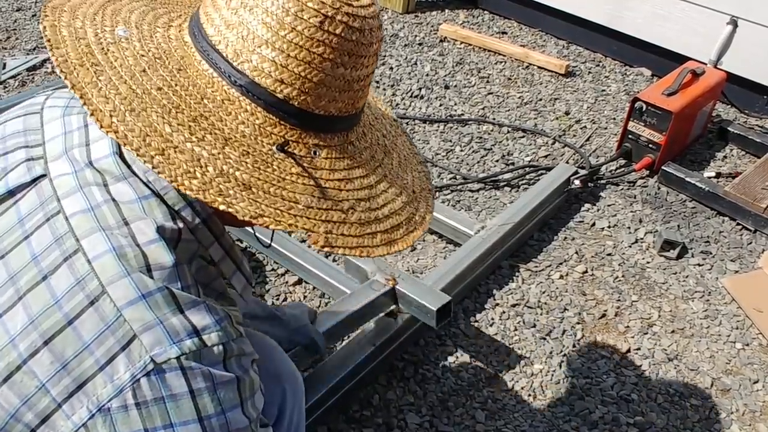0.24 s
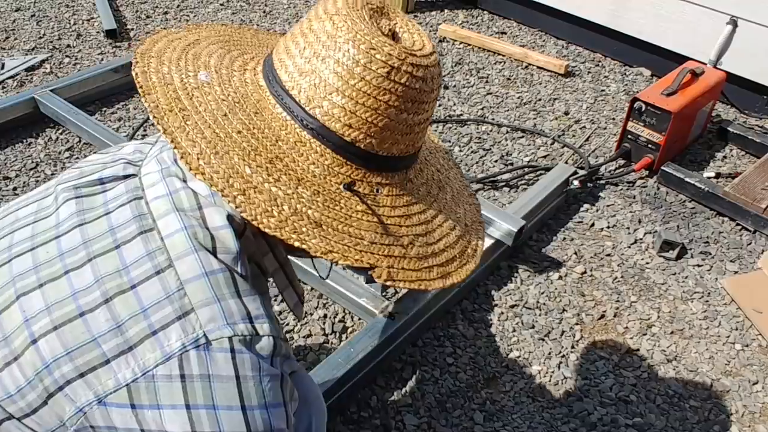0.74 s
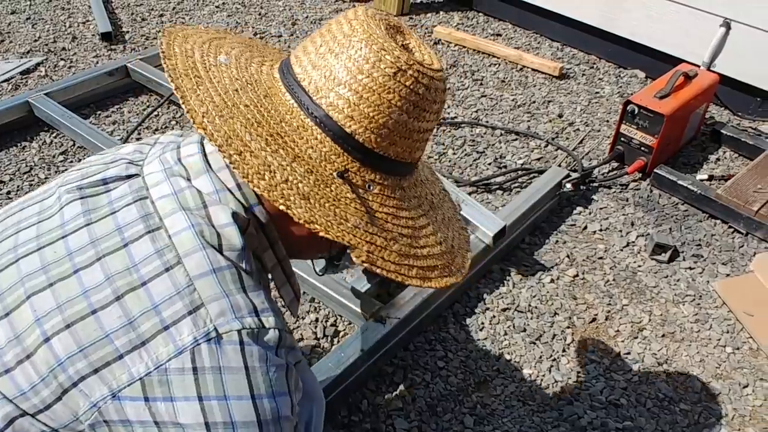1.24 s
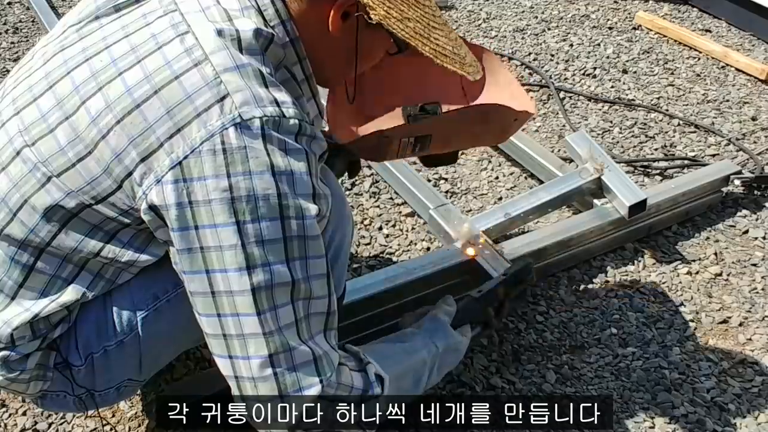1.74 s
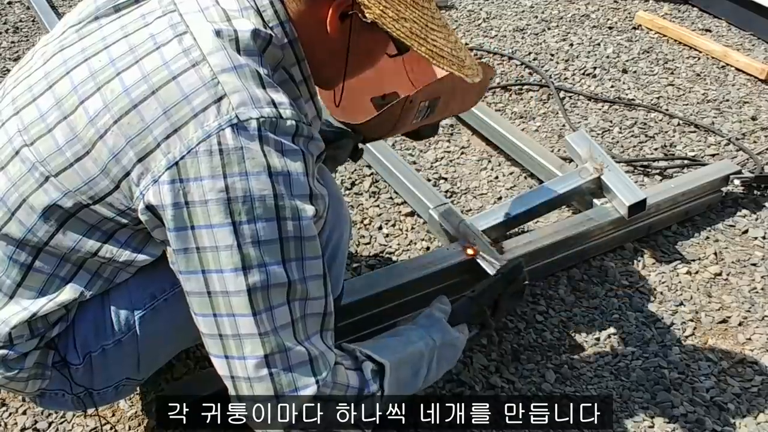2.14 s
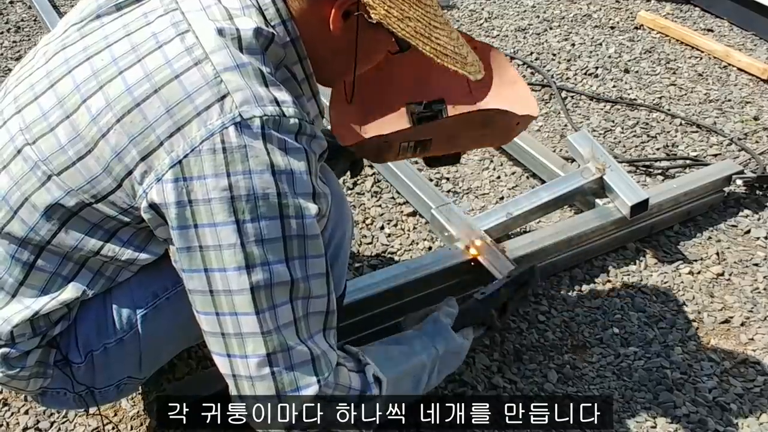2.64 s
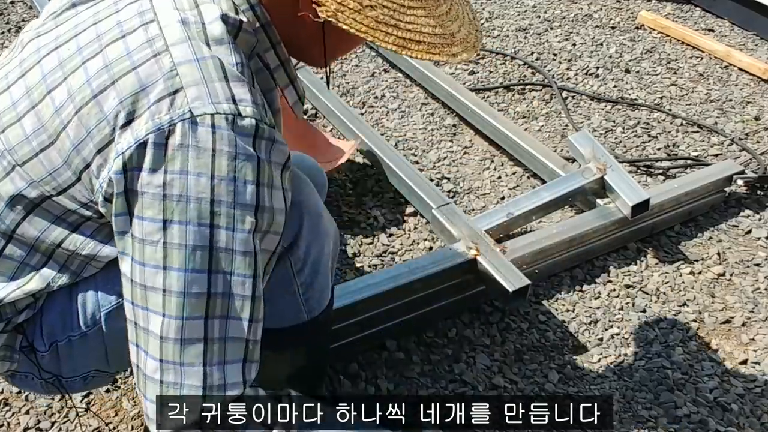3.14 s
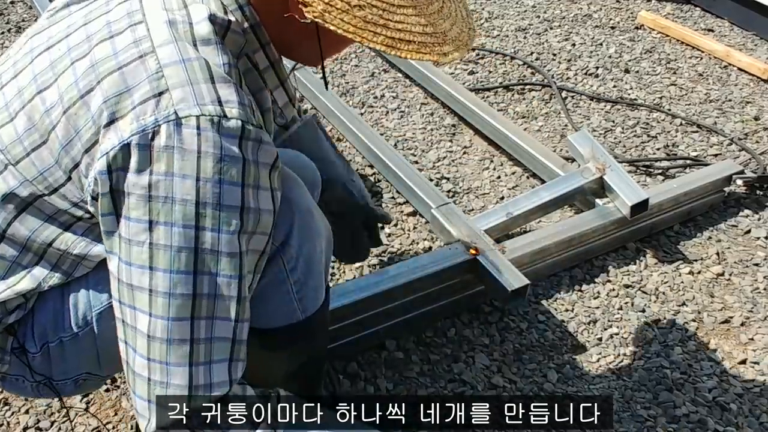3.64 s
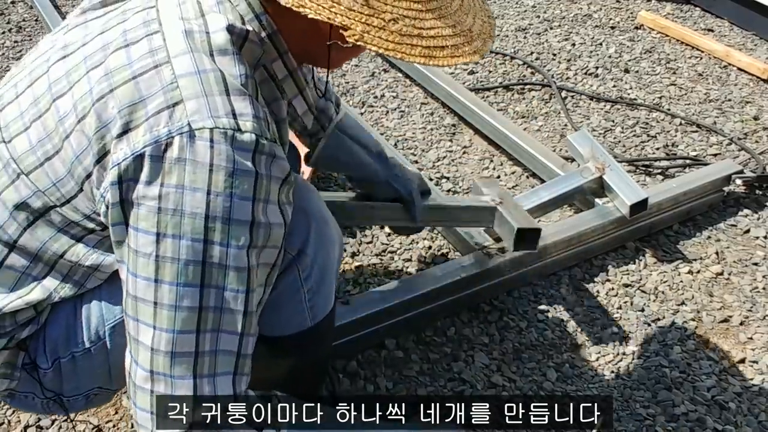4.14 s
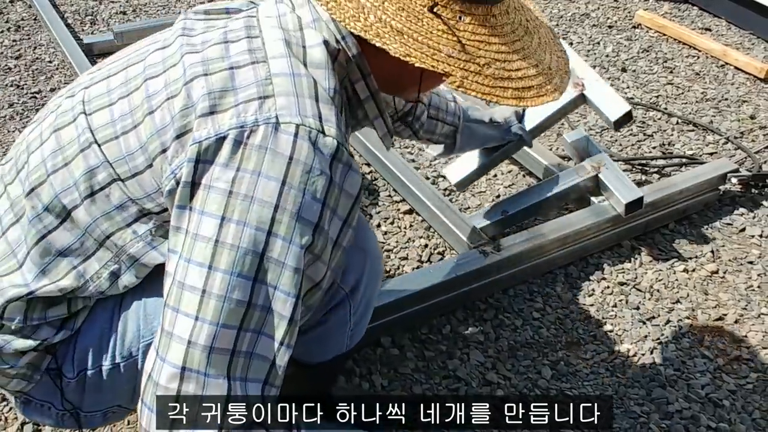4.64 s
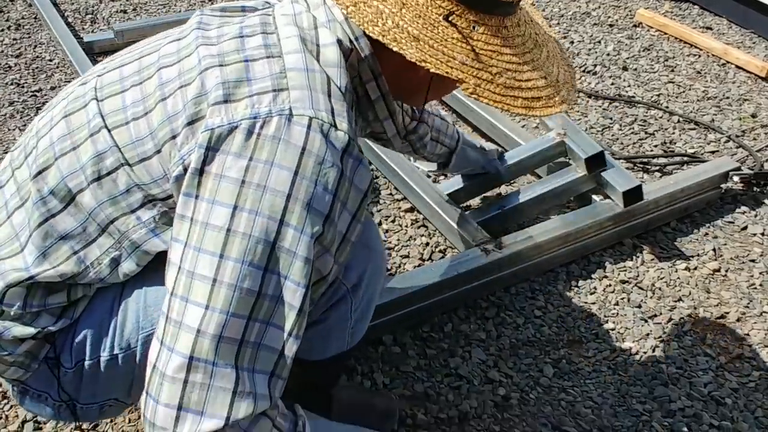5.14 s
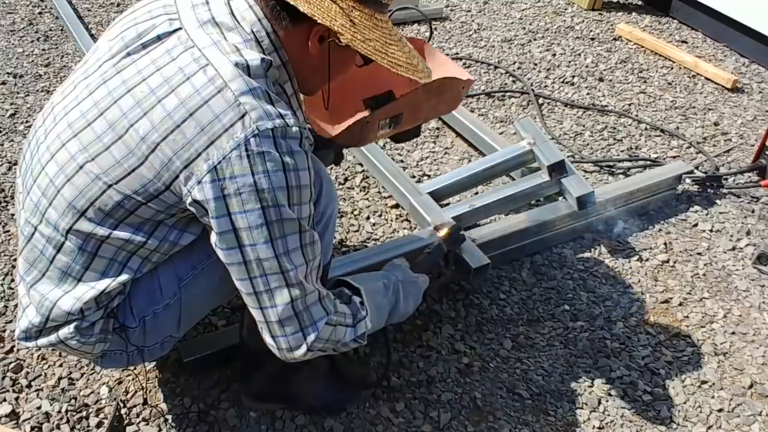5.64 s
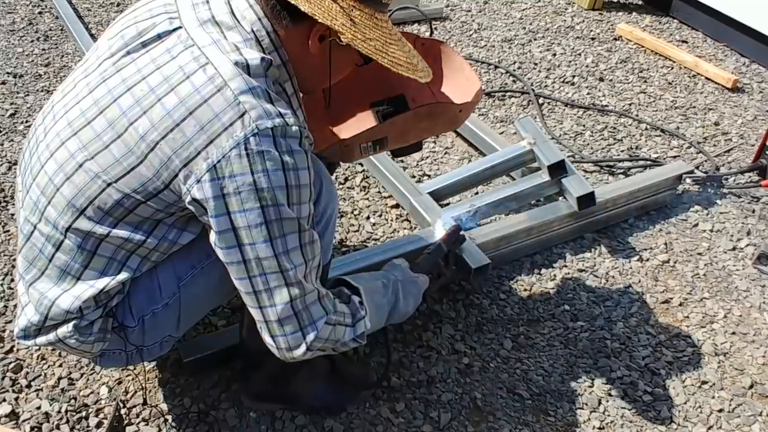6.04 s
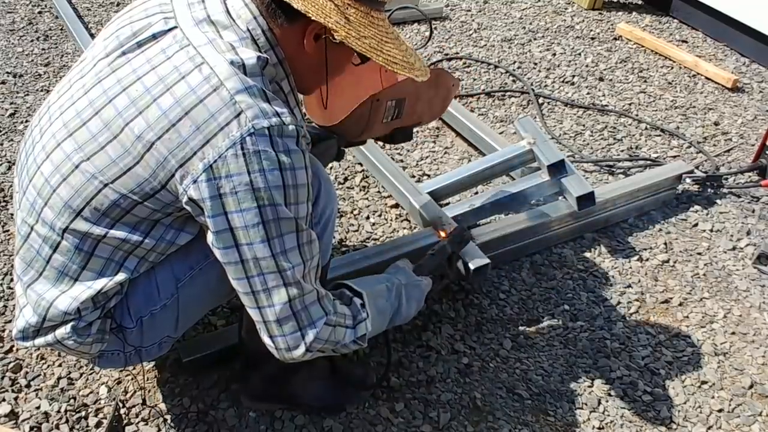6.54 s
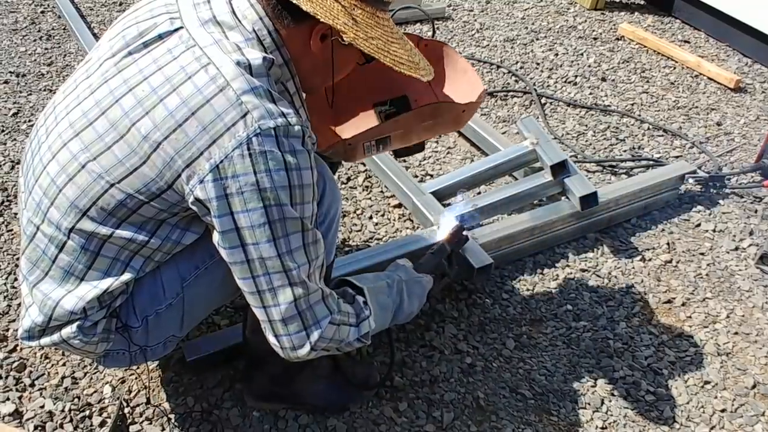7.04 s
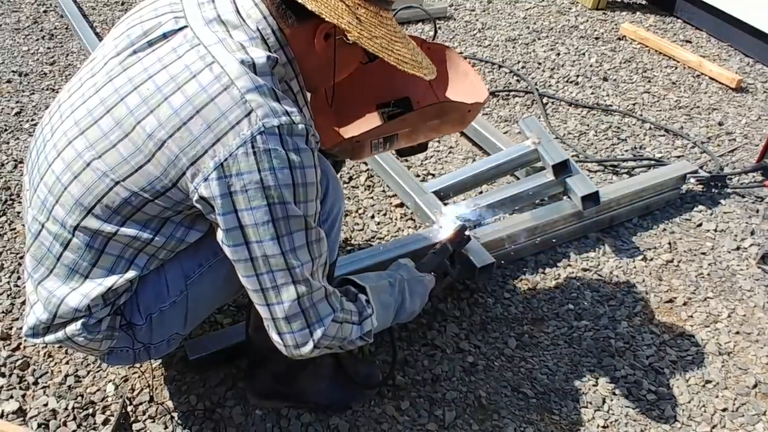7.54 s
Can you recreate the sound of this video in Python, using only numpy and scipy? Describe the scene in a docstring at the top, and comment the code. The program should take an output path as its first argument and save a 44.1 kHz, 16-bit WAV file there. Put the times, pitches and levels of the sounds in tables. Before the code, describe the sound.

Close outdoor stereo sound in a gravel yard. Loose steel tubes clank hard in the first half second, then small knocks and scrapes follow. A short weld crackles near two seconds, then metal and slag bits tick and knock. Tubes clunk lightly, then a loud ringing clank comes past four seconds. After a pause, longer sizzling burns spit until just after seven, ending in a small knock.

```python
"""Steel tubes and a stick welder

Square steel tubes are laid down, knocked and lifted on a gravel yard; between, a stick welder sizzles and spits.
Blows ring banks of decaying modes; shaped noise makes the loose steel and gravel, the arc, breeze and far traffic.
A hollow tube hoots as a wavering sine with breath. A two-port pocket microphone hears it all."""
import sys
import numpy as np
from scipy import signal
from scipy.fft import rfft, irfft, next_fast_len
from scipy.io import wavfile
from scipy.ndimage import uniform_filter1d

SR = 44100
rng = np.random.default_rng(int(sys.argv[2]) if len(sys.argv) > 2 else 0)


def file_out(sig):
    """Save sig as 16-bit WAV at sys.argv[1]."""
    # one column per channel
    cols = np.atleast_2d(sig).T
    # limit, then scale
    lim = np.clip(cols, -1, 1)
    pcm = np.round(lim * 32767).astype(np.int16)
    wavfile.write(sys.argv[1], SR, pcm)


N = 344421
# shares of a left-minus-right figure given to the left and right port
LEFT_RIGHT = np.array([[.5], [-.5]])

# Far traffic and rustle, spectral shape: f/Hz, relative level/dB per Hz
YARD_COLOUR = [(60, -28.5), (100, 3.5), (160, 1.5), (250, 0.5), (380, 4), (500, -8.5), (650, -6.5),
               (1000, -12.5), (1600, -18.5), (2400, -21.5), (4300, -21), (5200, -32), (8300, -30.5),
               (13000, -38.5)]
YARD_DB = -58  # rustle level before its swells
# Breeze on the ports: t/s, level/dB
BREEZE = [(0.0, -68.5), (0.48, -52.5), (0.96, -58.5), (1.15, -43), (1.2, -57), (1.28, -32.5), (1.46, -58),
          (1.569, -42.5), (1.65, -71), (2.04, -60.5), (2.089, -51.5), (2.65, -65), (2.67, -56),
          (4.39, -61.5), (4.44, -74), (4.96, -60), (6.79, -68.5), (7.81, -58)]
BREEZE_PAN_DB = -11  # left minus right
CALM_DB, GUST_SHARE = -67.5, .4  # above calm, the rustle swells by this share of the gust's dB

# Bending and wall modes of the tube: f/Hz
TUBE_HZ = [425, 549, 683, 782, 1245, 1260.4, 1271, 1345, 1727, 1825, 1856, 2049, 2060, 2081, 2089, 2096,
           2127, 2157, 2200, 2272, 2281, 2452, 2470, 2520, 2563, 2608, 2670, 2680, 2800, 3004, 3122, 3207,
           3246, 3300, 3515, 3650, 3684, 4194, 4288, 4523, 4615, 5010, 6890, 7120, 8955, 1150, 1480, 2864,
           3075, 4360, 4740, 5243, 5658, 5975, 7203]
# The same modes: own t60/s, then level/dB when laid down, tapped, lifted, dropped on the frame
TUBE_MODES = [(0.34, -31, -56.5, -38, -37), (0.16, -19, -37, -29.5, -30.5), (.15, -24, -44.5, -47, -41.5),
              (0.09, -14.5, -51, -37, -23), (0.052, -38, -47, -42.5, -27.5), (1.6, -62, -61, -59, -37),
              (5.0, -58.5, -61.5, -72, -46.5), (0.34, -38.5, -51, -38, -27.5), (0.5, -39, -64, -61, -29.5),
              (0.18, -33, -38, -46, -26.5), (0.16, -11, -22, -26.5, -20.5), (0.82, -48, -46, -44, -26.5),
              (.12, -33, -19, -46, -36), (0.8, -30.5, -46, -38.5, -32.5), (3, -57, -39, -57.5, -71.5),
              (0.9, -30, -49.5, -57, -27), (0.66, -44, -38.5, -33.5, -27), (0.88, -45.5, -52, -32, -35.5),
              (0.49, -47, -60, -46, -32), (0.12, -32, -19, -22, -31), (.7, -50, -55, -31.5, -35.5),
              (0.73, -45.5, -48.5, -48, -33.5), (.15, -40.5, -39, -44, -19), (.14, -23, -23.5, -42, -36),
              (0.44, -33, -44.5, -28, -22), (0.29, -16.5, -28.5, -33, -27),
              (0.75, -48.5, -55.5, -28.5, -50), (1.3, -32.5, -44, -46, -56), (0.44, -50, -50, -47, -33.5),
              (0.25, -30.5, -22.5, -30, -21), (0.37, -47, -48, -46, -25.5), (0.17, -41.5, -35, -32, -29),
              (0.074, -30.5, -11.5, -43.5, -25), (0.3, -52, -50.5, -55, -33.5), (.1, -38, -25, -51, -39.5),
              (0.39, -41.5, -36.5, -44.5, -22), (0.35, -36.5, -19, -33, -30),
              (0.43, -39.5, -41.5, -29.5, -28), (0.2, -29.5, -21, -38, -36.5),
              (0.072, -30.5, -16.5, -30, -40.5), (0.068, -26, -18.5, -52, -31.5),
              (0.2, -43, -50, -39, -31.5), (0.13, -43, -25.5, -38, -33.5), (0.12, -35, -47, -29, -26.5),
              (0.08, -37, -21, -42, -41.5), (0.17, -36, -50, -34, -35), (.25, -38.5, -50, -40, -38),
              (0.14, -31.5, -32.5, -36, -23), (0.13, -32, -30.5, -22.5, -23.5), (.28, -37.5, -32, -40, -31),
              (.3, -39.5, -36, -35, -37.5), (0.21, -40.5, -33.5, -40, -38), (0.092, -40, -34, -45.5, -37.5),
              (.09, -40.5, -31.5, -46, -30.5), (0.16, -38, -32.5, -41, -30)]
# Blows, one list per way of striking: t/s, strength/dB, time in the air before settling/s
BLOWS = [
    [(.072, -48.5, 0.046), (.280, 2, 0.054), (.347, -6, 0.012), (.364, -6, 0.029)],
    [(.487, 3.5, 0.04)],
    [(3.426, -3, 0.0073), (3.49, -9.5, 0.023), (3.514, -2.5, 0.025)],
    [(4.283, 3.5, 0.03), (4.32, 6, 0.027), (4.35, 2.5, 0.035)],
]
# When the last ring of each way of striking is stopped: t/s
LAST_RING_END_S = [.486, 1.632, 4.28, 5.355]
# Peak drive of the modes by loose rattle, per way of striking: level/dB
CHATTER_DB = [-21.5, -61.5, -13, -31.5]
# Tube balance per way of striking: left minus right/dB
TUBE_PAN_DB = [-2.5, -5.5, -1.4, -1.3]
AIR_SHARE = 0.54  # share of the damping spared in the air
SETTLE_S, SETTLE_LOSS = 0.04, 0.8  # while settling, extra loss as a multiple of the usual
OLD_RING_AGE_S, OLD_RING_DB, OLD_RING_END_S = 0.5, 3, 0.19  # an earlier lift still rings at the start

# Loose steel, gravel and cloth: t/s, level/dB, hold/s, t60/s, thud re clatter/dB, grit re clatter/dB
RATTLE = [(0.211, -47.5, 0.048, 0.034, -3.5, 7), (0.259, -45, 0.022, 0.034, 7, 6),
          (0.2793, -15, 0.0034, 0.19, -14, -61), (0.331, -40.5, 0.033, .1, 6.5, -43),
          (0.344, -19, 0.028, 0.44, -8.5, -62), (0.484, -14.5, 0.0025, 0.2, -43, -3.5),
          (0.502, -37, 0.091, 0.11, -0.5, -16), (0.596, -52, 0.94, .04, 0, -2.5),
          (0.616, -44.5, 0.036, 0.91, -6.5, -1), (0.734, -53.5, 0.075, 0.071, -2, 8),
          (0.979, -37, 0.0059, 0.098, -14, -0.5), (1.205, -45.5, 0.016, 0.72, 7, 7),
          (1.47, -48, 0.13, .04, -0.5, -7), (2.156, -65, 0.33, 0.043, 11.5, -3),
          (2.6762, -26, 0.0034, 0.19, -3.5, -24.5), (2.841, -55, 0.051, 0.13, 0, -30),
          (2.9, -45, 0.0044, 0.29, -6, -23), (3.065, -55.5, .01, 0.2, 4.5, -27),
          (3.139, -67, 0.17, .1, 7, -25), (3.308, -56, 0.08, .05, -1.5, -9),
          (3.397, -48, 0.022, .05, 9, -22), (3.418, -28, 0.0093, 0.3, 0.5, -38),
          (3.483, -40.5, 0.075, 0.24, -3.5, -9), (4.2807, -16.5, 0.081, 0.23, -11.5, -10),
          (4.451, -44, 0.042, 0.52, -52, -31), (5.327, -61, 0.031, .03, -19, -1),
          (7.607, -58, 0.0037, 0.75, -22, -4.5), (7.654, -69, 0.063, 0.043, 13.5, -7),
          (7.7678, -31, 0.0031, 0.1, 4, -13.5)]
# Thud, knock, clatter and grit bands: f/Hz, width/Hz
RATTLE_BANDS = [(370, 465), (1000, 475), (2600, 2350), (7000, 4000)]
RATTLE_RISE_S = 0.0013
THUD_LINGER, GRIT_LINGER = 0.94, .9  # their decay times as multiples of the clatter's

# Small knocks: t/s, body peak level/dB, body f/Hz, body t60/s, snap re body/dB
KNOCKS = [(0.221, -25, 6670, 0.032, 1), (.364, -12.5, 825, .012, 2), (.505, -20.5, 547, 0.053, -20),
          (.548, -23, 580, 0.072, -19.5), (0.628, -23, 8700, 0.054, -2), (0.733, -27.5, 990, 0.14, -1),
          (.897, -26, 7250, 0.028, 2), (0.943, -24.5, 4730, 0.013, 0), (.982, -28, 4900, 0.039, -8),
          (1.009, -30.5, 4500, 0.064, 6), (0.779, -43, 1190, 0.043, -1), (.81, -28.5, 1120, 0.027, 3),
          (1.092, -24.5, 1590, 0.013, -27), (1.182, -31, 970, 0.013, 1), (1.215, -23, 1200, 0.15, -5),
          (1.234, -22.5, 835, 0.028, -13), (1.284, -28, 1150, 0.045, 0), (1.301, -29.5, 890, 0.23, 2.5),
          (1.378, -26, 6560, 0.0048, -15), (1.491, -31.5, 1340, 0.1, -2), (1.529, -33, 1020, 0.056, 0),
          (1.56, -31, 1190, 0.046, -16), (1.60, -30.5, 780, 0.074, -18), (1.615, -25, 1520, 0.017, -3.5),
          (1.644, -54, 7020, 0.011, 2.5), (2.235, -48, 5500, 0.05, 11), (2.329, -44.5, 4530, 0.071, -0.5),
          (2.6797, -13.5, 1130, 0.015, -5.5), (2.699, -22.5, 1020, 0.042, -10.5),
          (2.733, -16, 2700, 0.0062, -33), (2.755, -25.5, 1450, 0.0097, -31.5),
          (2.79, -40, 1240, 0.018, -30), (2.865, -31, 1810, 0.044, -28), (2.896, -20, 2820, 0.029, -27),
          (2.897, -28, 1300, 0.025, -26.5), (2.948, -23.5, 3470, 0.0085, -27),
          (3.055, -45.5, 2144, 0.091, -20), (3.153, -34, 2080, 0.033, -25), (3.27, -42.5, 2230, 0.043, -7),
          (3.635, -43, 1360, 0.018, -16), (3.811, -46, 787, 0.018, -30), (3.811, -47.5, 1815, 0.017, -20),
          (3.844, -54.5, 3500, 0.13, 4.5), (3.946, -56.5, 1590, .02, -2.5), (4.08, -62, 2960, 0.025, 1),
          (4.913, -49, 4220, 0.021, -9), (4.915, -49, 1615, .02, -19), (4.974, -54, 1707, 0.035, -20),
          (5.941, -44.5, 4900, 0.044, -9), (7.771, -29, 770, 0.014, 1.5)]
KNOCK_THUD_DB = -16  # relative to the body

# Burns of the arc: strike t/s, catch t/s, break t/s
BURNS_S = [(1.776, 1.778, 2.092), (5.36, 5.41, 5.822), (6.336, 6.34, 6.542), (6.553, 6.58, 7.352)]
# Each burn: base level/dB, swell/dB, catch flare/dB, break flare/dB, base treble lift/dB,
# growl lift (about 0.4 to 2.4 kHz)/dB, left minus right/dB
ARC = [(-49, 8, 10, 9, -8.5, 7.5, 0), (-49, 7.5, 9.5, 12, 0.5, 0.6, 0), (-45, 1.2, 7, 9.5, -3.5, 4, -1),
       (-41.5, 5.5, -3.5, -1.5, -0.5, 0.4, -0.7)]
# Sizzle, spectral shape: f/Hz, relative level/dB per Hz
ARC_COLOUR = [(290, -18.5), (600, -22.5), (1090, -6), (1320, -8), (2070, -1.5), (3320, -2), (4100, -9),
              (4470, -3), (5300, -4.5), (6500, -12.5), (7300, -2.5), (8800, -8.5), (10100, -7),
              (12600, -19), (15000, -22)]
# Boom of gas in each burn: level/dB at the catch, level/dB just before the break
BOOM_DB = [(-40, -30), (-66, -31.5), (-39, -63), (-51, -31)]
CATCH_S, BREAK_S = 0.036, 0.019  # time constants of the flares
DIE_T60_S, BREAK_TREBLE_DB = 0.019, 4  # sizzle's decay after the break; treble added at the break
# Loud spits of metal: t/s, body peak level/dB, thump re body before a common lift/dB
SPITS = [(1.7565, -49, -38), (1.78, -24.5, -5.5), (1.858, -41, -40), (1.8961, -32, -12), (1.955, -26, -38),
         (1.963, -19.5, -25), (1.9795, -23, -38), (1.9978, -29, -23), (2.017, -39, -40),
         (2.0917, -13, -26.5), (2.114, -26, -39), (5.4024, -27, -27), (5.414, -23, -40), (5.419, -26, -25),
         (5.489, -23, -27), (5.541, -23, -30), (5.548, -22, -25), (5.59, -33, -40), (5.645, -28.5, -40),
         (5.676, -33, -40), (5.684, -20, -30), (5.7066, -17.5, -14.5), (5.759, -28, -40),
         (5.7995, -14.5, -27), (5.8084, -15.5, -29), (5.825, -14, -20), (6.34, -24, -14),
         (6.43, -20.5, -17), (6.495, -33, -40), (6.5113, -23.5, -40), (6.5393, -21.5, -23),
         (6.64, -37, -15), (6.7036, -42, -28), (6.7601, -18, -28), (6.774, -24, -36), (6.81, -32, -42),
         (6.857, -18, -34), (6.9988, -20, -25), (7.006, -17.5, -38), (7.0914, -18.5, -40),
         (7.1398, -25.5, -7), (7.2256, -13.5, -27), (7.2907, -21, -19.5), (7.3258, -33, -19),
         (7.341, -14.5, -31), (7.351, -13, -18)]
SPIT_HISS_DB, THUMP_LIFT_DB = 3, 2.5  # hiss relative to the body; lift common to all thumps
SMALL_SPITS_PER_S, SMALL_SPIT_DB, SMALL_SPIT_SPREAD_DB = 6, -50, 5  # spread is plus or minus
SMALL_THUMP_DB = -20  # relative to the body, before the common lift

# Air in a hollow tube, puff by puff: t/s, nominal length/s, pitch f/Hz, level/dB before flutter
HOOT = [(2.736, 0.035, 602.5, -36), (2.784, 0.031, 605.5, -43), (2.865, 0.026, 606.4, -49.5),
        (2.9, 0.013, 602, -23.5), (2.92, 0.011, 619, -37), (2.955, 0.016, 602.6, -34.5),
        (2.982, 0.022, 606, -43), (3.005, 0.013, 600.7, -33.5), (3.025, 0.069, 618.4, -47),
        (3.163, 0.023, 627.5, -49.5), (5.642, 0.06, 649, -49.5), (5.718, 0.061, 643, -45),
        (5.768, 0.076, 666.5, -40.5), (5.821, 0.073, 647, -44), (5.927, 0.042, 652, -44.5),
        (7.378, 0.07, 650, -45), (7.469, 0.028, 782, -48.5), (7.5, 0.045, 632, -50.5)]
# Modes of the electrode rod: f/Hz, t60/s, level/dB
ROD_MODES = [(1082, 0.76, -9), (2480, 0.18, -10.5), (2820, 0.57, -17), (3904, 0.22, -2), (4200, 0.12, 1.5),
             (4230, 0.15, -6), (5470, 0.24, -8), (7800, .15, -14)]
# The rod touches the steel: t/s, strength/dB
TICKS = [(7.61, -45), (7.652, -51.5)]
TOP_HZ = 15900  # the microphone's steep cut-off


def undb(db):
    """Decibels to an amplitude factor."""
    return 10 ** (np.asarray(db) / 20)


def unit(x):
    """Scale to an RMS of 1."""
    return x / np.sqrt(np.mean(x ** 2))


def band(x, hz, width):
    """Two-pole-pair band-pass around hz."""
    low = np.sqrt(hz ** 2 + width ** 2 / 4) - width / 2
    high = min(low + width, .48 * SR)
    return signal.sosfilt(signal.butter(2, [low, high], "bandpass", fs=SR, output="sos"), x)


def colour(x, points):
    """Shape the spectrum by (Hz, dB) points on a log axis."""
    hz, db = np.transpose(points)
    f = np.arange(x.shape[-1] // 2 + 1) * SR / x.shape[-1]
    gain = undb(np.interp(np.log(f + 1), np.log(hz), db))
    return irfft(rfft(x) * gain, x.shape[-1])


def walk(rate):
    """Random levels, slewed from one to the next each 1 / rate s; RMS 1."""
    k = int(SR / rate)
    steps = np.repeat(rng.standard_normal(N // k + 1), k)
    return unit(uniform_filter1d(steps, k)[:N])


def grains(rate, spread_db, hiss):
    """Random clicks of very unequal size over a steady hiss."""
    hits = rng.random(N) < rate / SR
    size = undb(spread_db * np.minimum(rng.exponential(size=N), 3.5))
    clicks = hits * size * rng.standard_normal(N)
    return unit(unit(clicks) + hiss * rng.standard_normal(N))


def burst(hz, width, t60, crack=11.0, size=6000):
    """A dying puff of noise in one band, peak 1."""
    noise = rng.standard_normal(size)
    noise[0] = crack  # the first contact stands out of the noise
    decay = undb(-60 * np.arange(size) / SR / max(t60, .002))
    y = band(noise * decay, hz, width)
    return y / np.abs(y).max()


def add(out, s, y):
    """Lay y into out from s seconds on."""
    i = int(s * SR)
    out[..., i:i + y.shape[-1]] += y[..., :N - i]


def ring(push, hz, t60, sign=1):
    """One decaying mode; the ports tend to differ more in phase and size the higher it is."""
    pole = np.exp((2j * np.pi * hz - np.log(1000) / t60) / SR)
    z = signal.lfilter([1], [1, -pole], push)
    phase = .62 + .18 * rng.standard_normal()
    size = .17 * rng.standard_normal()
    apart = (hz + 700) / 4000 * (1j * phase + size)
    return sign * np.imag(z * np.exp(apart * np.array([[-1], [1]])))


def ports(x, pan_db, lag, scatter, wet_db, t60=0.028):
    """The left port hears lag samples later; the housing scatters treble phase; ground and wall add a tail."""
    n = next_fast_len(N + 8192)
    f = np.arange(n // 2 + 1) * SR / n
    knots = rng.standard_normal(90)
    wander = np.interp(f, np.linspace(0, SR / 2, 90), knots)
    turn = 2 * np.pi * f * lag / SR + scatter * np.minimum(f / 5000, 1) * wander
    direct = np.exp(.5j * turn * np.array([[-1], [1]]))
    t = np.arange(8192) / SR
    tail = rng.standard_normal((2, 8192)) * undb(-60 * t / t60) * (t > .003)
    tail *= undb(wet_db) / np.sqrt(np.sum(tail ** 2, axis=1, keepdims=True))
    reflected = rfft(tail, n) * np.minimum(0.19 + f / 1500, 1)  # thinner in the bass
    both = irfft(rfft(x, n) * (direct + reflected), n)[:, :N]
    return both * undb(LEFT_RIGHT * pan_db)


def yard():
    """Far traffic and rustle, more alike at both ports in the bass; breeze buffets each port alone."""
    breeze_db = np.interp(np.arange(N) / SR, *np.transpose(BREEZE))
    mid, side = colour(rng.standard_normal((2, N)), YARD_COLOUR)
    high_pass = signal.butter(2, 700, "high", fs=SR, output="sos")
    side = 0.41 * side + signal.sosfilt(high_pass, 2.0 * side)
    swell_db = GUST_SHARE * np.maximum(breeze_db - CALM_DB, 0)
    far = unit(mid + side * np.array([[1], [-1]])) * undb(YARD_DB + swell_db + 1.2 * walk(5.1))
    breeze = np.array([unit(band(rng.standard_normal(N), 61, 45)) for _ in range(2)])
    return far + breeze * undb(breeze_db + LEFT_RIGHT * BREEZE_PAN_DB)


def old_ring():
    """The lifted tube's modes, already partly decayed, fade out at the start."""
    push = np.zeros(int(OLD_RING_END_S * SR))
    push[0] = undb(OLD_RING_DB)
    modes = 0
    for hz, (t60, *db) in zip(TUBE_HZ, TUBE_MODES):
        modes = modes + undb(db[2] - 60 * OLD_RING_AGE_S / t60) * ring(push, hz, t60)
    fade = np.hanning(2 * len(push))[len(push):] ** 0.28
    return fade * modes


def tube(shake):
    """Blows and chatter ring the modes, longer while in the air; the next contact stops them, and the last ring
    of each way ends abruptly at a set time."""
    out = np.zeros((2, N))
    for way, blows in enumerate(BLOWS):
        stops = [blow[0] for blow in blows[1:]] + [LAST_RING_END_S[way]]
        for (s, blow_db, air_s), stop in zip(blows, stops):
            a, b = int(s * SR), int(stop * SR) + 100
            push = shake[a:b] / np.abs(shake[a:b]).max() * undb(CHATTER_DB[way])
            push[0] += 1  # the blow itself
            i = np.arange(b - a)
            age = i / SR
            spared = AIR_SHARE * np.minimum(age, air_s) - SETTLE_LOSS * np.clip(age - air_s, 0, SETTLE_S)
            edges = np.minimum(np.minimum(i / 12, i[::-1] / 200), 1)  # contact takes a moment
            modes = 0
            for k, (hz, (t60, *db)) in enumerate(zip(TUBE_HZ, TUBE_MODES)):
                sign = (-1) ** k  # neighbours start opposed
                modes = modes + undb(db[way] + 60 * spared / t60) * ring(push, hz, t60, sign)
            out[:, a:b] += undb(blow_db + TUBE_PAN_DB[way] * LEFT_RIGHT) * edges * modes
    add(out, 0, old_ring())
    return band(out, 2600, 16000)


def rattle():
    """Dense grains in four bands; each stir rises, holds and dies. Also returns the clatter's raw shake."""
    t = np.arange(N) / SR
    power = np.zeros((4, N))
    for s, db, hold, t60, thud_db, grit_db in RATTLE:
        a, b = int(s * SR), int((s + hold + 2 * t60) * SR)
        rise = np.minimum((t[a:b] - s) / RATTLE_RISE_S, 1)
        since = np.maximum(t[a:b] - s - hold, 0)
        tone_db = np.array([[thud_db], [0.5 + 0.41 * thud_db], [0], [grit_db]])
        linger = np.array([[THUD_LINGER], [THUD_LINGER ** 0.15], [1], [GRIT_LINGER]])
        power[:, a:b] += (rise * undb(db + tone_db - 60 * since / t60 / linger)) ** 2
    force = np.sqrt(power)
    grit = grains(2500, 0.66, 1.2) * undb(2.0 * walk(40))
    specks = grit + 1.0 * grains(120, 1.6, 0.01)  # single stones click above the rustle
    sources = [grit, grit * undb(2.0 * walk(90)), grit, specks]
    bands = []
    for source, (hz, width) in zip(sources, RATTLE_BANDS):
        bands.append(unit(band(band(source, hz, width), hz, 3.9 * width)))
    return np.sum(force * bands, axis=0), force[2] * grit


def knocks():
    """Short contacts of steel, stone and board: a coloured body, a bright snap, a thud."""
    out = np.zeros(N)
    for s, db, hz, t60, snap_db in KNOCKS:
        body = burst(hz, 0.38 * hz, t60)
        snap = undb(snap_db) * burst(4500, 6600, 0.3 * t60, 4.5)
        thud = undb(KNOCK_THUD_DB) * burst(250, 350, 0.073)
        add(out, s, undb(db) * (body + snap + thud))
    return out


def spit(thump_db):
    """A spit of metal: a short body, a shorter hiss and a thump of gas."""
    body = burst(2200, 3320, 0.0081, 6.5)
    hiss = undb(SPIT_HISS_DB) * burst(6900, 6500, 0.0048, 4.6)
    thump = undb(thump_db + THUMP_LIFT_DB) * burst(206, 450, 0.019, 6.9)
    return body + hiss + thump


def sizzle():
    """Boiling metal: tiny shorts as gusty, coloured crackle, level set in the middle band."""
    crackle = grains(1200, 1.6, 1.1)
    fry = colour(crackle * undb(2.54 * walk(60) + 1.2 * walk(11)), ARC_COLOUR)
    return fry / np.sqrt(np.mean(band(fry, 1760, 2880) ** 2))


def arc():
    """Each burn shapes the sizzle with flares at catch and break; spits and booms of gas lie over it."""
    t = np.arange(N) / SR
    gain, lift, growl, pan, spits = np.zeros((5, N))
    small = []
    for (strike, catch, end), settings, booms in zip(BURNS_S, ARC, BOOM_DB):
        db, swell_db, catch_db, break_db, treble_db, growl_db, pan_db = settings
        lit = t >= strike
        breaking = np.exp(-np.maximum(end - t, 0) / BREAK_S)
        shape_db = swell_db * np.clip((t - strike) / (end - strike), 0, 1)
        shape_db += catch_db * np.exp(-np.abs(t - catch) / CATCH_S)
        shape_db += break_db * breaking
        shape_db -= 60 * np.maximum(t - end, 0) / DIE_T60_S
        gain += lit * undb(db + shape_db)
        lift[lit] = (treble_db + BREAK_TREBLE_DB * breaking)[lit]
        growl[lit], pan[lit] = growl_db, pan_db
        for s, boom_db in zip((catch, end - BREAK_S / 2), booms):
            add(spits, s, undb(boom_db) * burst(120, 112, 0.14))
        for place, size in rng.random((int(SMALL_SPITS_PER_S * (end - strike)), 2)):
            level_db = SMALL_SPIT_DB + 2 * SMALL_SPIT_SPREAD_DB * (size - .5)
            small.append((strike + place * (end - strike), level_db, SMALL_THUMP_DB))
    fry = sizzle()
    treble = (undb(lift) - 1) * band(fry, 10000, 10000)
    low = (undb(growl) - 1) * band(fry, 990, 2040)
    burning = gain * (fry + treble + low)
    for s, peak_db, thump_db in SPITS + small:
        add(spits, s, undb(peak_db) * spit(thump_db))
    both = ports(burning, 0, 1.52, 0.81, -10.5, 0.21) + ports(spits, -1.8, 1.0, 1.0, -2.5, 0.078)
    return both * undb(pan * LEFT_RIGHT)


def hoot():
    """A narrow air resonance blown in uneven, breathy puffs: a wavering sine plus band noise."""
    puffs, hz = np.zeros(N), np.zeros(N)
    for s, span, pitch_hz, db in HOOT:
        add(puffs, s, undb(db) * np.hanning(int(1.42 * span * SR)) ** 0.52)
        hz[int(s * SR):] = pitch_hz
    phase = 2 * np.pi * np.cumsum(hz) / SR + 0.53 * walk(70)
    air = unit(band(rng.standard_normal(N), 602, 168))
    return puffs * ((1 + 0.42 * walk(90)) * np.sin(phase) + 0.18 * air)


def rod():
    """Light ticks of the electrode on steel ring the rod's modes."""
    push = np.zeros(N)
    for s, db in TICKS:
        push[int(s * SR)] = undb(db)
    return sum(undb(db) * ring(push, hz, t60) for hz, t60, db in ROD_MODES)


def scene():
    """Sum every source at the two ports."""
    loose, shake = rattle()
    contacts = ports(loose + knocks() + hoot(), -0.24, 1.6, 1.0, -3.5)
    return yard() + tube(shake) + contacts + arc() + rod()


def record(dry):
    """The microphone rounds the loudest peaks, droops in the top octave and is cut off steeply."""
    rounded = np.tanh(0.79 * dry) / 1.139
    dull = signal.sosfilt(signal.butter(4, 11500, fs=SR, output="sos"), rounded)
    return signal.sosfilt(signal.ellip(10, .2, 80, TOP_HZ, fs=SR, output="sos"), dull)


dry = scene()
out = record(dry)
file_out(out)
```